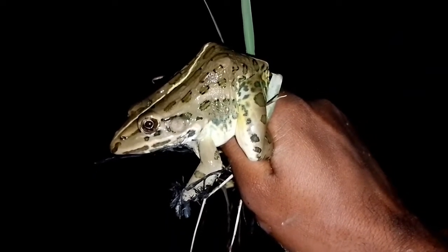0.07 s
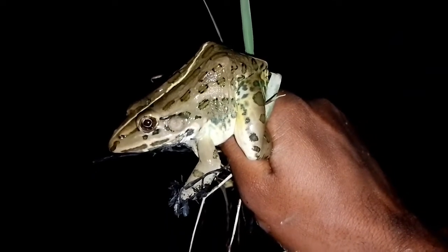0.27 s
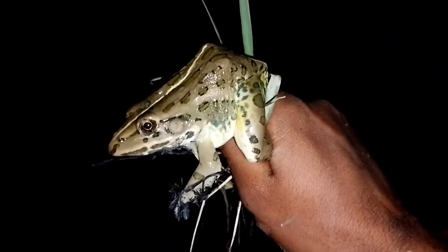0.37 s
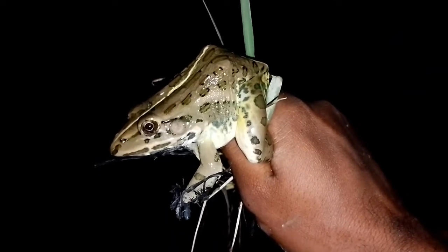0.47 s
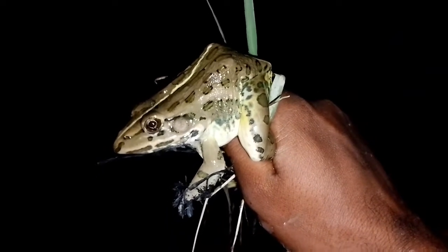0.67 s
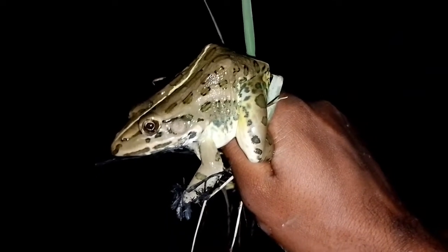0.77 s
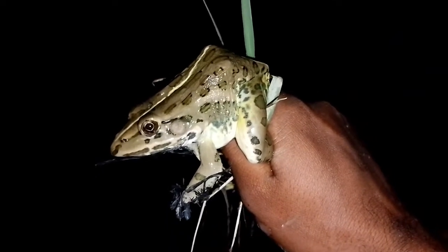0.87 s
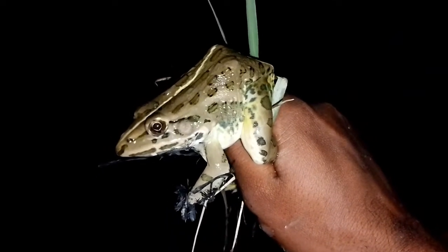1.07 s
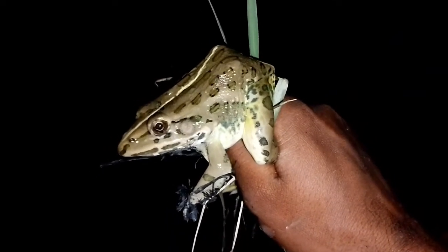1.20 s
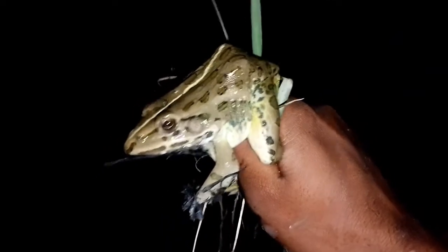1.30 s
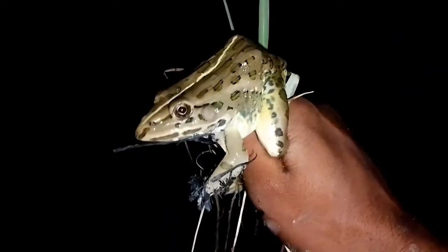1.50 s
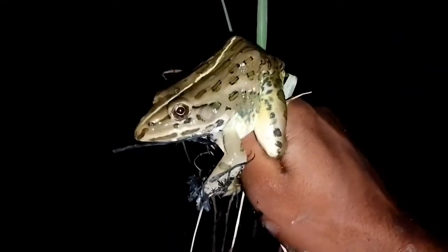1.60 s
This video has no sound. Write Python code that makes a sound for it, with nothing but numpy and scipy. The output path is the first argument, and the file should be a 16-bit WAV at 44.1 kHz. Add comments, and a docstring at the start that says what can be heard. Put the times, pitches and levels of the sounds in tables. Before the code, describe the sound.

A frog held in the hand cries twice, close to the microphone: slow creaky clicks quicken into a bright, piercing wail, then drop off. A soft hoot follows the first; faint crickets trill in quiet outdoor night air.

```python
"""Two rising, sagging frog cries close by at night, a soft hoot after the first, and two tiny dry ticks.
Larynx clicks start slowly, speed up into a wail and slow again; each click rings a moving mouth resonance,
fixed head resonances and a low throat. The hoot is a sine with its octave, the ticks are brief snaps.
One cricket trills near by, a second trills and a third chirps farther off: all are drooping wing-stroke tones.
Coloured noise makes the quiet night air and a low rush as each cry ends."""
import sys
import numpy as np
from scipy import signal
from scipy.fft import rfft, irfft, next_fast_len
from scipy.io import wavfile
from scipy.ndimage import uniform_filter1d

SR = 44100
rng = np.random.default_rng(int(sys.argv[2]) if len(sys.argv) > 2 else 0)


def dump(signal):
    """Clip the signal to [-1, 1] and save it as 16-bit WAV at the path in sys.argv[1]."""
    limited = np.clip(np.atleast_2d(signal).T, -1, 1)
    pcm = np.round(limited * 32767).astype(np.int16)
    wavfile.write(sys.argv[1], SR, pcm)


N = 72765  # length in samples


def cry(rows, head_start):
    """The larynx clicks once per cycle of a gliding rate; every click excites the cavities around it."""
    # Fixed resonances of head, upper head, throat and treble: (f/Hz, t60/ms before the limits in ring, level/dB)
    head = [(1936, 6, -3.5), (2510, 7, -13.5), (3474, 20, 4)]
    upper_head = [(5205, 6.6, -8.5), (5988, 14, -1), (7025, 18, -15)]
    throat = [(450, 12, -9), (738, 9.8, 1), (1002.5, 6.2, 9.5), (1600, 7, -11.5)]
    treble = [(8336, 6, 6), (10000, 5, -19), (11430, 2.6, -1), (14400, 4, -22)]
    larynx_lag_s = 0.024  # smoothing of the click rate
    open_s, throat_lag_s = 0.00019, 0.00043  # onset times: rise of a click, slower start of the throat
    mouth_cut_hz = 1100  # bass loss of the mouth
    hiss_db = -44  # air noise in mouth and head
    # At roughness 1: timing scatter/cycles, noise in mouth/dB, noise in throat, hiss in treble
    jitter, breathy_db, throat_rasp, treble_hiss = 0.045, -16.5, 1.3, 4

    s, rate, *curves, roughness = np.transpose(rows)
    t = np.arange(s[0], s[-1], 1 / SR)
    smooth_rate = uniform_filter1d(np.interp(t, s, rate), round(larynx_lag_s * SR), mode="nearest")
    cycles = head_start + np.cumsum(smooth_rate) / SR
    whole = np.arange(1, int(cycles[-1]) + 1)
    rough = np.interp(whole, cycles, np.interp(t, s, roughness))
    times = np.interp(whole + jitter * rough * rng.standard_normal(len(whole)), cycles, t)
    rough = rough[:, None]
    # Denser clicks are each weaker, so that the rate alone does not raise the power
    size = 1 / np.sqrt(np.interp(times, s, rate))[:, None]
    at_clicks = [np.interp(times, s, curve)[:, None] for curve in curves]
    mouth_hz, mouth_t60, mouth_db, head_db, upper_db, throat_db, treble_db = at_clicks

    def bank(u, modes, rise_s):
        """Parallel resonances with alternating signs."""
        return sum((-1) ** k * amp(db) * ring(u, hz, t60_ms, rise_s)
                   for k, (hz, t60_ms, db) in enumerate(modes))

    def click(u):
        """Mouth, head and treble ring brightly without bass; the throat rings below them."""
        hiss = rng.standard_normal(u.shape)
        bright = amp(mouth_db) * ring(u, mouth_hz, mouth_t60, open_s)
        bright = bright + amp(head_db) * bank(u, head, open_s)
        bright = bright - amp(upper_db) * bank(u, upper_head, open_s)
        bright = bright * (1 + amp(hiss_db) * hiss)
        bright = bright + amp(treble_db) * bank(u, treble, open_s) * (1 + treble_hiss * rough * hiss)
        f = np.fft.rfftfreq(1024, 1 / SR)
        bass_loss = (1j * f / (mouth_cut_hz + 1j * f)) ** 4
        bright = irfft(rfft(bright, 1024) * bass_loss, 1024)[:, :u.shape[1]]
        low = amp(throat_db) * bank(u, throat, throat_lag_s)
        # Slow grain, smoothed twice, shared by both parts
        grain = 8 * uniform_filter1d(uniform_filter1d(rng.standard_normal(u.shape), size=45), size=45)
        bright = bright * (1 + amp(breathy_db) * rough * grain)
        low = low * (1 + throat_rasp * rough * grain)
        return size * (bright + low)
    return laid(times, click, size=700)


def ring(t, hz, t60_ms, rise_s):
    """A damped resonance of about unit energy with a soft onset; its t60 is held within 1-16 ms."""
    loss = np.log(1000) / (np.clip(t60_ms, 1, 16) / 1000)
    onset = (1 - np.exp(-t / rise_s)) ** 2
    return 2 * np.sqrt(loss) * np.sin(2 * np.pi * hz * t) * np.exp(-loss * t) * onset


def path(f):
    """Response from frog to microphone: small-body bass loss, treble roll-off, cancellations, one echo."""
    # Cancellations on the way: (f/Hz, width/Hz, depth/dB)
    notches = [(870, 500, -9.5), (1400, 130, -29.5), (3785, 120, -5), (7650, 600, -9), (8780, 500, -10.5)]
    echo_s, echo_db = 0.0028, -13.5  # echo off the hand
    low_cut_hz, air_loss_hz = 360, 12000
    gain = 1 + amp(echo_db) * np.exp(-2j * np.pi * f * echo_s)
    gain = gain * (1j * f / (low_cut_hz + 1j * f)) ** 4 / (1 + (f / air_loss_hz) ** 4)
    for hz, width, db in notches:
        detune = hz * hz - f * f
        gain = gain * (detune + 1j * f * width * amp(db)) / (detune + 1j * f * width)
    return gain


def hoot():
    """A soft closed-mouth tone: a gliding sine and its octave, each with its own level curve."""
    # Pitch and rms levels along the hoot: (t/s, f/Hz, tone level/dB, octave level/dB)
    glide = [(0.585, 695, -68.5, -89), (0.607, 708, -79, -82), (0.637, 643, -70, -99),
             (0.645, 611, -73, -99), (0.679, 608, -59.5, -73), (0.695, 553, -74, -93),
             (0.707, 532, -90, -105), (0.71, 532, -91, -96)]
    s, hz, *levels = np.transpose(glide)
    t = np.arange(N) / SR
    turn = 2 * np.pi * np.cumsum(np.interp(t, s, hz)) / SR
    return sum(np.sqrt(2) * amp(np.interp(t, s, db, -140, -140)) * np.sin((k + 1) * turn)
               for k, db in enumerate(levels))


def room(voice):
    """Faint scatter from plants: the voice convolved with decaying noise of unit energy."""
    t60_s, level_db = 0.15, -42.5
    t = np.arange(SR // 4) / SR
    tail = rng.standard_normal(len(t)) * amp(-60 * t / t60_s)
    return amp(level_db) * signal.fftconvolve(voice, tail / np.linalg.norm(tail))[:N]


def ticks():
    """Dry snaps: very short decaying 11 kHz bursts, thinned below 4 kHz."""
    # Tiny snaps: (t/s before a 0.21 ms delay, level/dB before a 7.5 dB lift and the high-pass)
    snaps = [(0.1863, -22), (0.1935, -45.5)]
    t60_s = 0.00042
    s, db = np.transpose(snaps)

    def snap(u):
        level = amp(db[:, None] + 7.5 - 60 * u / t60_s)
        return level * (u > 0) * np.cos(2 * np.pi * 11000 * u)
    return filtered(laid(s + 0.00021, snap, size=90), lambda f: f ** 2 / (f ** 2 + 4000 ** 2))


def crickets():
    """Two steady trills of slightly uneven wing strokes, near and far, and a third cricket's far chirps."""
    # Trills: (first stroke t/s, strokes per s, stroke length/s, start f/Hz, droop/Hz, level/dB)
    trills = [(-.0015, 47.38, 0.016, 7230, 800, -60.5), (0.011, 44.5, .014, 7200, 249.6, -72.5)]
    # Far single chirps: (t/s, start f/Hz, level/dB)
    chirps = [(.613, 5000, -78), (.692, 4150, -96), (.695, 5190, -93), (.765, 5300, -89), (.84, 4950, -80),
              (0.88, 4905, -84), (1.555, 4950, -86.5), (1.6, 4980, -91), (1.64, 4950, -76.5)]
    trill_curve, trill_scatter_db = 4.5, 1.2
    chirp_s, chirp_droop_hz, chirp_curve = 0.018, 603, 0.8
    out = 0
    for first, rate, length_s, start_hz, droop_hz, db in trills:
        luck = rng.standard_normal((90, 3))  # timing, level and pitch of each stroke
        times = abs(first + np.arange(90) / rate + 0.000067 * luck[:, 0])
        gain = amp(db + trill_scatter_db * luck[:, 1:2])
        hz = start_hz + 12 * luck[:, 2:]
        out = out + laid(times, lambda u: gain * stroke(u, length_s, hz, droop_hz, trill_curve), size=900)
    s, hz, db = np.transpose(chirps)[:, :, None]
    return out + laid(s[:, 0], lambda u: amp(db) * stroke(u, chirp_s, hz, chirp_droop_hz, chirp_curve),
                      size=900)


def stroke(u, length_s, hz, droop_hz, curve):
    """One wing stroke: a tone and weak octave swell and fade while the pitch droops; higher curve, later."""
    overtone_db = -26
    v = np.clip(u / length_s, 0, 1)
    turn = 2 * np.pi * (hz * u - droop_hz * length_s * v ** (curve + 1) / (curve + 1))
    swell = np.sin(np.pi * v) ** 0.6
    return np.sqrt(2) * swell * (np.sin(turn) + amp(overtone_db) * np.sin(2 * turn))


def air():
    """Steady night air and microphone hiss, with a low noise rush around the end of each cry."""
    # Colours of the steady air and of the rush: (f/Hz, relative density/dB per Hz)
    air_colour = [(20, -12.5), (50, -7.5), (150, -29.5), (280, -4.5), (700, -12), (2000, -22.5),
                  (4500, -20.5), (5800, -16), (7700, -15), (9500, -20), (14000, -11), (15700, -18.5)]
    rush_colour = [(200, -30.5), (300, 1.5), (700, -5.5), (1500, -12), (3000, -22.5)]
    # Rush level, one curve per cry: (t/s, level/dB)
    rush_curves = [
        [(0.36, -82.5), (0.538, -62), (0.646, -84.5), (0.666, -80), (0.72, -102)],
        [(1.3, -80.5), (1.436, -79), (1.454, -66.5), (1.514, -83.5), (1.62, -104)],
    ]
    air_db = -71.5
    t = np.arange(N) / SR
    rush = sum(amp(np.interp(t, *np.transpose(rows), -140, -140)) for rows in rush_curves)
    return amp(air_db) * noise(air_colour) + rush * noise(rush_colour)


def noise(spectrum):
    """White noise shaped to a colour drawn over log frequency, scaled to rms 1."""
    f, db = np.transpose(spectrum)
    x = filtered(rng.standard_normal(N), lambda hz: amp(np.interp(np.log(hz + 1), np.log(f), db)))
    return x / x.std()


def amp(db):
    """Decibels to linear amplitude."""
    return 10 ** (np.asarray(db) / 20)


def filtered(x, response):
    """Apply a complex response of frequency by FFT, zero-padded by at least half a second."""
    m = next_fast_len(N + SR // 2)
    return irfft(rfft(x, m) * response(np.fft.rfftfreq(m, 1 / SR)), m)[..., :N]


def laid(times, shape, size):
    """Sum short sounds of size samples; shape gets the time since each start, one row per sound."""
    first = np.floor(times * SR).astype(int)
    where = first[:, None] + np.arange(size)
    since = np.maximum(where / SR - times[:, None], 0)
    return np.bincount(where.ravel(), shape(since).ravel(), N + 2 * SR)[:N]


def scene():
    """The frog's cries and hoot excite the plants' scatter; ticks, crickets and air stay dry."""
    # Each cry over time: (t/s, click rate/Hz, mouth f/Hz, mouth t60/ms before the limits in ring,
    # mouth, head, upper head, throat and treble level/dB before the click-rate scaling, roughness 0-1)
    first_cry = [(0.0, 23, 3370.0, 7.5, -91.0, -105.0, -101.0, -73.5, -104.0, 0.2),
                 (0.03, 61.2, 3400, 7.5, -98, -105.0, -84, -67, -102.0, 0),
                 (0.065, 42.5, 3420, 7.5, -52.0, -91, -78.0, -67, -92, 0.14),
                 (0.08, 52.6, 4100, 7.5, -50.0, -68, -68.5, -64.5, -90, 0.2),
                 (0.095, 57.8, 4250.0, 7.5, -45.5, -66, -72.5, -63, -81, 0.2),
                 (0.13, 128.8, 4130, 7.5, -40.5, -61, -79, -62.5, -79, 0.2),
                 (0.17, 167.3, 4030, 7.5, -30.5, -56.5, -55, -57, -94, 0.2),
                 (0.21, 281, 4140, 7.5, -21, -41.5, -48.0, -57.0, -82, 0.2),
                 (0.25, 344.4, 4330, 4.0, -16.5, -41.0, -41, -50.0, -75, 0.17),
                 (0.29, 416.6, 4500, 4.0, -15, -36.5, -28.5, -53.5, -54.5, 0.2),
                 (0.325, 439, 4540, 4.0, -20, -37, -23.5, -52.5, -48, 0.2),
                 (0.36, 535.6, 4570, 5.5, -14, -32.5, -23, -46.5, -46.5, 0.09),
                 (0.39, 629.7, 4275, 5.5, -10.5, -29, -23, -47, -42.5, 0.16),
                 (0.42, 718, 4506, 5.5, -5, -36.5, -27.0, -44.5, -41.5, 0.05),
                 (0.445, 779.5, 4350, 5.5, -6.5, -17.5, -26, -35.5, -39.5, 0),
                 (0.457, 781.6, 4085, 5.5, -6, -24, -25.5, -40, -37.5, 0.03),
                 (0.47, 763.7, 3780.0, 5.5, -9.5, -20, -26.5, -36, -41.5, 0.03),
                 (0.49, 695.3, 3650, 5.5, -12.5, -27, -39, -43, -46, 0.04),
                 (0.503, 643, 3354, 5.5, -39.5, -30, -46.5, -32.5, -50.5, 0.1),
                 (0.515, 588.6, 3280, 5.5, -58, -67, -55, -44.5, -58.5, 0.2),
                 (0.535, 473, 3240, 4.0, -51, -85.5, -64.5, -42, -73, 0.5),
                 (0.55, 326.3, 3280, 4.0, -70.5, -81, -67, -52.0, -73.5, 0),
                 (0.565, 240.0, 3353, 4.0, -91, -86, -74, -56.5, -76.5, 0.7)]
    second_cry = [(0.995, 54.72, 3400, 6.9, -99, -112.0, -101.0, -76.5, -106.0, 0.1),
                  (1.03, 40.14, 3260, 9.8, -60.5, -104.0, -81, -74.5, -103.0, 0.1),
                  (1.065, 44.28, 3960, 5.2, -48, -64, -76, -67, -80, 0.1),
                  (1.095, 94.2, 3480, 11, -50.0, -60.5, -65, -66, -82, 0.1),
                  (1.13, 115.9, 2710, 21, -48.0, -56.5, -66, -63.5, -71, 0.1),
                  (1.165, 166.4, 2590, 15, -37.5, -68, -68.5, -61, -78, 0.1),
                  (1.19, 200.2, 3153, 5.8, -34, -54.5, -62.5, -55.5, -68, 0.1),
                  (1.215, 225.7, 3960, 5.5, -25.5, -42, -73.5, -60, -87.5, 0.1),
                  (1.245, 252.8, 4360, 7.5, -20.5, -44.0, -47.5, -55.5, -84, 0.1),
                  (1.275, 287.6, 4580, 3.2, -17.5, -44, -34, -59, -87.5, 0.1),
                  (1.3, 403.2, 4430.0, 3.2, -13.5, -37, -32.0, -49, -68.5, 0.1),
                  (1.33, 464, 4200, 6.4, -11.5, -32.5, -36.0, -54, -57, 0.1),
                  (1.355, 546.2, 4107, 7.7, -9.5, -30.5, -36, -39, -57, 0.1),
                  (1.375, 656.8, 3800, 8.6, -7.5, -25.5, -33, -48, -50.5, 0.1),
                  (1.395, 670, 3300, 9.9, -12.0, -25, -40, -44.5, -43, 0.1),
                  (1.407, 645, 3030, 5.5, -46.5, -29, -43, -40.5, -61, 0.1),
                  (1.42, 600.4, 3100.0, 5.5, -52.5, -64, -48.5, -36, -68, 0.1),
                  (1.44, 523, 3100.0, 4.0, -53.5, -63.5, -55.5, -44.5, -70.5, 0.1),
                  (1.455, 354, 3100.0, 4.0, -69, -71.5, -59, -45.5, -82, 0.5),
                  (1.47, 267.6, 3105, 1.6, -66, -77.5, -64, -49.5, -86.5, 0.5),
                  (1.492, 205.8, 3100.0, 2.8, -99.5, -75, -79.0, -68, -80.5, 0.5)]
    # Share of a click cycle already run as each cry begins
    head_starts = [.97, .83]
    cries = cry(first_cry, head_starts[0]) + cry(second_cry, head_starts[1])
    frog = filtered(cries, path) + hoot()
    mono = frog + room(frog) + ticks() + crickets() + air()
    return np.array([mono, mono])


def record(dry):
    """A mono microphone with a steep band limit and a small resting offset."""
    top_hz, offset = 15750, -0.0002
    return filtered(dry, lambda hz: hz < top_hz) + offset


dry = scene()
out = record(dry)
dump(out)
```